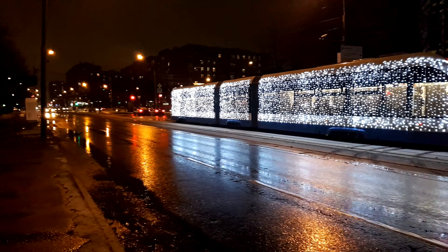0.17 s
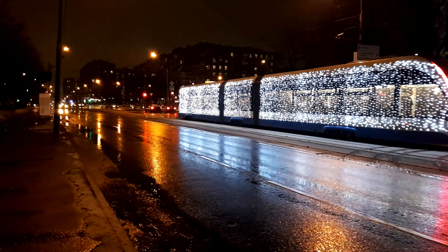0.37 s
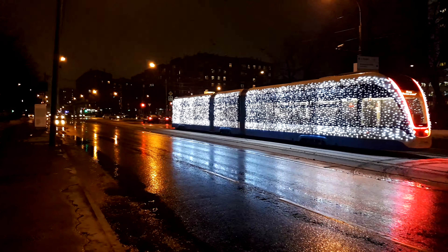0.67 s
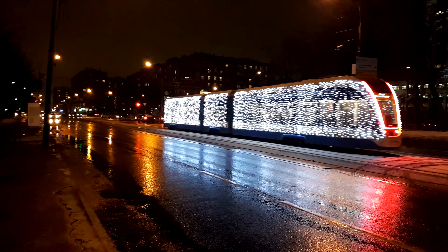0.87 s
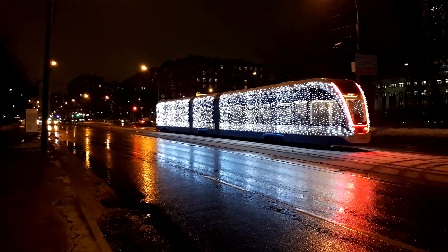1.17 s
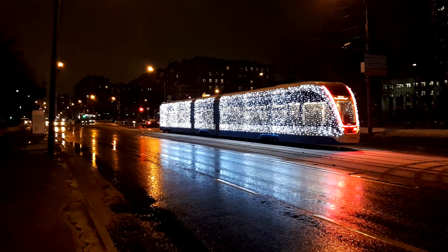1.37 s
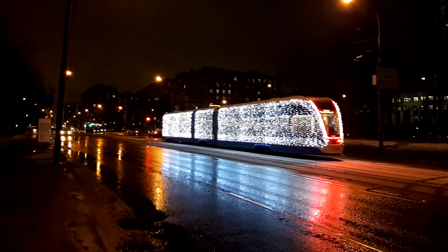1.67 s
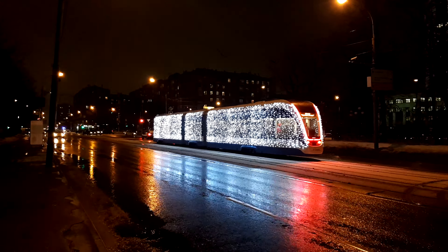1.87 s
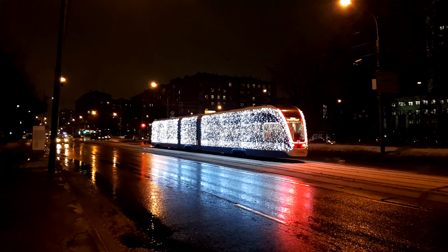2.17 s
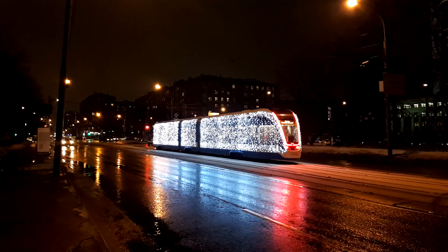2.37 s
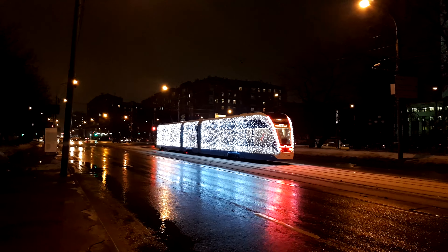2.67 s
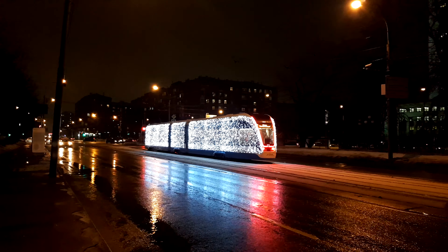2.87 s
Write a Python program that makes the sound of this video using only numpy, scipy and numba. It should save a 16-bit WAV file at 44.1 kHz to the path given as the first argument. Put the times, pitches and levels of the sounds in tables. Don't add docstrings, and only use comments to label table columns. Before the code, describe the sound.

A tram rolls away along a wet street, whining, under heavy crackling wind on the microphone.

```python
import sys
import numpy as np
from scipy import signal
from scipy.fft import rfft, irfft
from scipy.io import wavfile
from scipy.ndimage import uniform_filter1d
from numba import njit

SR = 44100
rng = np.random.default_rng(int(sys.argv[2]) if len(sys.argv) > 2 else 0)


def attenuation_scalar(level_db):
    decades = np.asarray(level_db, float) / 20
    return 10 ** decades


def digitize_waveform(pressure):
    field = np.atleast_2d(pressure).T
    bounded = np.clip(field, -1, 1)
    quanta = np.round(bounded * 32767).astype(np.int16)
    wavfile.write(sys.argv[1], SR, quanta)


N = 132741

# time_s, level_db
STREET_GAIN = [(0, -68.5), (.19, -72), (.3, -74.5), (.45, -74), (.57, -73), (.61, -82.5), (.65, -74),
               (.72, -84), (.76, -80), (.8, -83), (1.15, -88), (1.33, -82.5), (1.6, -79), (2.16, -78),
               (2.34, -72), (2.46, -72), (2.95, -70.5), (3.01, -70)]
# time_s, level_db
PULL = [(0, 5), (.08, -2.5), (.19, 3.5), (.28, -16), (1.31, -24), (1.35, -6), (1.53, -2), (1.62, -5),
        (1.72, 1.5), (1.81, -5), (1.94, 3.5), (2.14, -5.5), (2.33, 7.5), (2.48, 0), (2.59, -0.5),
        (2.67, 1.5), (2.89, -1), (3.01, 4)]
# frequency_hz, level_db (per Hz)
HISS_LEFT = [(5500, -99), (7500, -101), (9500, -90.5), (11500, -95), (16500, -101)]
# time_s, left_db, right_db
BREEZE = [(0, -16.5, -31), (.4, -16, -15), (.95, -16.5, -21.5), (1.2, -17, -23), (1.5, -22.5, -17.5),
          (1.9, -22.5, -29.5), (2.4, -32, -19), (2.6, -25.5, -24.5), (3.01, -31.5, -30)]
WHINE_HZ = 2474


@njit
def low(x, hz, k):
    y, b, l = np.empty(len(x)), 0., 0.
    for i in range(len(x)):
        g = np.tan(np.pi * hz[i] / SR)
        v = (b + g * (x[i] - l)) / (1 + g * (g + k))
        y[i] = l + g * v
        b, l = 2 * v - b, 2 * y[i] - l
    return y


def walk(rate):
    step = np.repeat(rng.standard_normal(1000), int(SR / max(rate, 1)) + 1)[:N]
    step = np.pad(step, (0, N - len(step)), mode="wrap")
    k = int(SR / max(rate, 1))
    return 1.3 * uniform_filter1d(uniform_filter1d(step, k), k)


def curve(table, col=1):
    points = np.array(table)
    return np.interp(np.arange(N) / SR, points[:, 0], points[:, col])


def noise(shape, flicker_db, rate):
    f, out = np.arange(1, N // 2 + 2) * SR / N, 0
    hz, db = np.array(shape).T
    level = attenuation_scalar(np.interp(np.log(f), np.log(hz), db, -200, -200))
    spectrum = rfft(rng.standard_normal(N)) * level * np.sqrt(SR / 2)
    for mid in np.arange(11, 29):
        band = np.clip(1 - abs(2 * np.log2(f) - mid), 0, 1)
        out = out + attenuation_scalar(flicker_db * walk(rate)) * irfft(spectrum * band, N)
    return out


def rolling():
    # time_s, level_db
    distance = [(0, -1.5), (.3, 1), (.55, 0), (.7, -2.5), (1.2, 3), (1.7, 0.5), (1.92, -0.5), (2.1, -0.5),
                (3.01, -4)]
    # frequency_hz, level_db (per Hz)
    left_shape = [(60, -46), (300, -59.5), (800, -63.5), (2000, -70), (4200, -78.5), (5200, -73.5),
                  (5900, -87), (6800, -100)]
    right_shape = [(60, -41), (300, -64), (700, -67.5), (1000, -78.5), (2600, -88.5), (2950, -95),
                   (3400, -109), (6800, -121)]
    roar_shape = [(250, -72.5), (500, -54.5), (1200, -64), (1800, -68), (2500, -98)]
    roar_end_s, roar_fade_s = 0.54, 0.1
    t = np.arange(N) / SR
    both = np.array([noise(left_shape, 1.72, 14), noise(right_shape, 1.7, 40)])
    both = both * attenuation_scalar(curve(distance) + walk(4.57))
    both[0] += noise(roar_shape, 2.6, 10) / (1 + np.exp((t - roar_end_s) / roar_fade_s))
    return both


def spray_hiss(duck_db):
    # frequency_hz, level_db (per Hz)
    right_shape = [(3000, -111), (8500, -120), (16500, -111)]
    patch_db = 2 * np.minimum(walk(30), .3)
    left = noise(HISS_LEFT, 1.5, 30) * attenuation_scalar(0.97 * (duck_db + patch_db))
    right = noise(right_shape, 1.5, 30) * attenuation_scalar(0.8 * (duck_db + patch_db))
    return np.array([left, right])


def inverter():
    # multiple of WHINE_HZ, left_db, right_db
    lines = [(1, -63.5, -76.5), (2, -45.5, -96.5), (3, -68, -115), (4, -66, -112), (5, -63, -108),
             (6, -71, -108)]
    # offset_hz, level_db
    sidebands = [(-220, -66), (-76, -63), (78, -63), (216, -64)]
    waver_db, waver_rate, blur_rad = 2.6, 70, .35
    turn, out = 2 * np.pi * np.arange(N) / SR, 0
    for k, left_db, right_db in lines:
        db = np.array([[left_db], [right_db]]) + waver_db * np.sqrt(k / 2) * walk(waver_rate)
        db = db + (k > 2) * 1.7 * walk(10)
        out = out + attenuation_scalar(db) * np.sin(round(k) * (WHINE_HZ * turn + blur_rad * walk(49)))
    for off_hz, db in sidebands:
        phase = (2 * WHINE_HZ + off_hz) * turn + 1.5 * walk(25)
        out[0] += attenuation_scalar(db + 4 * walk(7)) * np.sin(phase)
    return np.sqrt(2) * out * attenuation_scalar(curve(PULL))


def gate(x):
    threshold_db, spread_db, rate = 173, 4, 18
    f, spectrum = np.arange(N // 2 + 1) * SR / N, rfft(x)
    margin_db = curve(PULL) - curve(STREET_GAIN) - threshold_db
    line_distance_hz = abs(f - WHINE_HZ * np.round(f / WHINE_HZ))
    between_lines = np.clip(line_distance_hz / 50 - 6, 0, 1)
    for lo in np.arange(2.5, 6.5, .25):
        band = np.clip(np.minimum(f / WHINE_HZ - lo, lo + .25 - f / WHINE_HZ) * 40 + .5, 0, 1)
        hiss_db = np.interp(lo * WHINE_HZ, *np.array(HISS_LEFT).T)
        is_shut = margin_db - hiss_db + spread_db * walk(rate) > 0
        shut = uniform_filter1d(1. * is_shut, 400)
        x = x - shut * irfft(spectrum * band * between_lines, N)
    return x


def wind(gusts, breeze_db, breeze_hz, fine, tail_db):
    edge_s, flicker_rate, flicker_db, flicker_oct = 0.011, 120, 1.5, .23
    t, power = np.arange(N) / SR, attenuation_scalar(breeze_db) ** 2
    hz = power * breeze_hz
    for s, length, db, eddy_hz in gusts:
        rise_and_fall = np.clip(np.minimum(t - s, s + length - t) / edge_s + .5, 0, 1)
        gust = attenuation_scalar(db) ** 2 * rise_and_fall ** 2
        power, hz = power + gust, hz + gust * eddy_hz
    speed = np.clip(walk(flicker_rate), -2, 1.5)
    hz = np.clip(fine * hz / power * 2 ** (flicker_oct * speed), 30, 6000)
    body = low(rng.standard_normal(N), hz, 1.61)
    body = low(body, 2.2 * hz, 1.4) + attenuation_scalar(tail_db) * low(body, 3.04 * hz, 1.1)
    return body * np.sqrt(SR / 4 / hz * power) * attenuation_scalar(flicker_db * speed + 1.0)


def right_wind():
    # start_s, length_s, level_db, eddy_hz (swirls per second)
    gusts = [(0.0, 0.22, -20.5, 176), (0.363, 0.052, -9, 120), (0.565, 0.073, -10, 170),
             (0.628, 0.023, -8.5, 203), (0.664, 0.043, -8, 213), (0.776, 0.053, -11.5, 153),
             (0.823, 0.057, -16.5, 149), (0.98, 0.024, -15, 160), (1.053, 0.034, -29, 129),
             (1.126, 0.1, -19.5, 170), (1.278, 0.054, -10.5, 170), (1.318, 0.018, -8.5, 180),
             (1.411, 0.026, -19, 129), (1.471, 0.055, -25, 130), (1.552, 0.021, -19, 133),
             (1.599, 0.083, -17, 203), (1.689, 0.039, -15, 216), (1.752, 0.022, -17, 170),
             (1.81, 0.04, -12.5, 156), (2.013, 0.073, -27, 180), (2.13, 0.053, -30, 160),
             (2.268, 0.037, -23, 141), (2.337, 0.059, -10.5, 108), (2.392, 0.047, -15, 135),
             (2.468, 0.081, -23, 149), (2.817, 0.11, -18.5, 137)]
    return wind(gusts, curve(BREEZE, col=2), 120, .85, -22)


def dip(u, side):
    return (u * u - 1 + (2 * side - 1) * u) * np.exp(-u * u / 2)


def snaps():
    # time_s, peak_db, width_ms
    events = [(0.2694, -9, 0.33), (0.2858, -17, 0.3), (0.5489, -20.5, 0.3), (0.5778, -16, 0.2),
              (0.5835, -10, 0.17), (0.5913, -5.5, 0.2), (0.6012, -13, 0.38), (0.6099, -13.5, 0.21),
              (0.6154, -18, 0.17), (0.622, -25, 0.21), (0.7032, -16.5, 0.3), (0.7171, -16, 0.25),
              (0.7313, -20.5, 0.28), (0.7469, -17.5, 0.3), (0.765, -17.5, 0.25), (0.7743, -19.5, 0.33),
              (0.779, -14.5, 0.36), (0.8002, -20, 0.37), (0.8155, -32, 0.3), (0.847, -20.5, 0.24),
              (0.8767, -10.5, 0.22), (0.8835, -14, 0.3), (0.9134, -16, 0.22), (0.9213, -15.5, 0.22),
              (0.9296, -17.0, 0.23), (0.9352, -16.5, 0.2), (0.9905, -20.5, 0.37), (1.029, -21, 0.3),
              (1.038, -7, 0.35), (1.0472, -13.0, 0.3), (1.0733, -10.5, 0.22), (1.0959, -5.5, 0.11),
              (1.1022, -12.5, 0.22), (1.1196, -16.5, 0.29), (1.126, -24, 0.25), (1.1393, -21, 0.22),
              (1.147, -8, 0.32), (1.2144, -16, 0.37), (1.2212, -9.5, 0.2), (1.2301, -11, 0.12),
              (1.2411, -12, 0.17), (1.253, -8.5, 0.14), (1.2588, -12, 0.17), (1.2663, -8.5, 0.15),
              (1.279, -10, 0.22), (1.2875, -13.0, 0.18), (1.2926, -7, 0.2), (1.3087, -8.5, 0.15),
              (1.316, -13, 0.18), (1.3284, -8, 0.27), (1.574, -15, 0.23), (1.5836, -7, 0.16),
              (1.6385, -17, 0.29), (1.7794, -19.0, 0.39), (1.805, -22.5, 0.35), (1.9545, -29, 0.35),
              (1.9709, -16.5, 0.15), (2.0563, -18.5, 0.34), (2.1305, -24, 0.35), (2.168, -16, 0.3)]
    snap_db, thump_ms, thump_db = 3.5, 0.65, -1.5
    crackle_db, rise_s, fall_s, crackle_hz = -3, 0.0026, 0.0038, 1058
    out, burst, t = np.zeros(N), np.zeros(N), np.arange(-2000, 2000) / SR
    for (s, db, wide_ms), (slow, side) in zip(events, rng.random((len(events), 2))):
        thump_u = 1000 * t / (thump_ms * (.6 + .8 * slow)) - 1 + 2 * slow
        thump = attenuation_scalar(thump_db) * dip(thump_u, 1 - side)
        width_ms = max(wide_ms, .14 * attenuation_scalar(-.5 * (db + 6)))
        i = int(s * SR)
        out[i - 2000:i + 2000] += attenuation_scalar(db + snap_db) * (dip(1000 * t / width_ms, side) + thump)
        burst[i - 2000:i + 2000] += attenuation_scalar(db) * np.exp(-abs(t) / np.where(t < 0, rise_s, fall_s))
    hz = np.full(N, 1. * crackle_hz)
    grit = rng.standard_normal(N) * attenuation_scalar(4 * walk(400))
    grit = low(low(grit, hz, 2.13), 1.37 * hz, 1.266) * np.sqrt(SR / 2 / crackle_hz)
    return out + attenuation_scalar(crackle_db) * burst * grit


def left_wind():
    # start_s, length_s, level_db, eddy_hz (swirls per second)
    gusts = [(0.054, 0.021, -4, 246), (0.08, 0.054, -11, 326), (0.155, 0.042, -19.5, 280),
             (0.218, 0.087, -14, 313), (0.442, 0.032, -11.5, 238), (0.497, 0.013, -7, 193),
             (0.54, 0.015, -7.5, 208), (0.576, 0.023, -1, 338), (0.6, 0.027, -8.5, 377),
             (0.695, 0.026, -10, 336), (0.736, 0.11, -18, 365), (0.863, 0.012, -10, 403),
             (0.895, 0.043, -12, 350), (1.006, 0.057, -12.5, 404), (1.072, 0.067, -18.5, 440),
             (1.128, 0.015, -16.5, 354), (1.206, 0.019, -12.5, 467), (1.245, 0.091, -15, 580),
             (1.296, 0.053, -13, 412), (1.426, 0.062, -16.5, 360), (1.567, 0.026, -14, 340),
             (1.575, 0.235, -18.5, 380), (1.604, 0.066, -6.5, 289), (1.672, 0.07, -12.5, 380),
             (1.75, 0.059, -11, 300), (1.892, 0.02, -15, 245), (1.951, 0.047, -16.5, 314),
             (2.004, 0.016, -10.5, 200), (2.067, 0.067, -23, 323), (2.166, 0.038, -15.5, 358),
             (2.242, 0.19, -31.5, 360)]
    port_hz, squash = 5400, .74
    left = wind(gusts, curve(BREEZE), 170, 0.88, -9.0) + snaps()
    port = signal.butter(6, port_hz, fs=SR, output="sos")
    left = signal.sosfilt(port, squash * np.tanh(left / squash))
    for s, db in ((.5906, -6), (.5943, -16)):
        i = int(s * SR)
        ms = 1000 * np.arange(N - i) / SR
        left[i:] += attenuation_scalar(db) * (np.exp(-ms / .5) - np.exp(-ms / .05))
    return left


def splash():
    splash_s, rise_s, fall_s, splash_hz = 1.86, 0.086, 0.23, 2100
    peaks = ((.6, -48), (.82, -35), (1, -28), (1.25, -43), (1.62, -36), (1.9, -50))
    shape = [(splash_hz * ratio, db) for ratio, db in peaks]
    t = np.arange(N) / SR
    swell = np.exp(-((t - splash_s) / np.where(t < splash_s, rise_s, fall_s)) ** 2 / 2)
    wet = noise(shape, 1.74, 29.47) * attenuation_scalar(-32.5) * swell
    return wet * attenuation_scalar(np.array([[0], [-20.5]]))


def scene():
    duck_db = curve(STREET_GAIN) + 70
    street = spray_hiss(duck_db) + (rolling() + splash()) * attenuation_scalar(0.8 * duck_db)
    left = left_wind() + gate(street[0])
    right = right_wind() + street[1]
    return np.array([left, right]) + inverter()


def roll_off(x):
    return signal.sosfilt(signal.butter(12, 15710, fs=SR, output="sos"), x)


def record(dry):
    x = signal.sosfilt(signal.butter(2, 65, "high", fs=SR, output="sos"), dry)
    x = np.clip(x, -.985, .985)
    return roll_off(x)


dry = scene()
out = record(dry)
digitize_waveform(out)
```